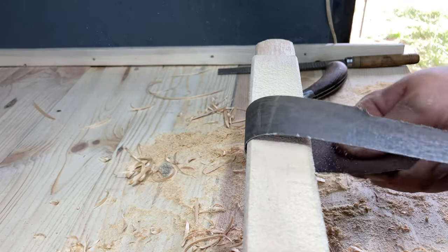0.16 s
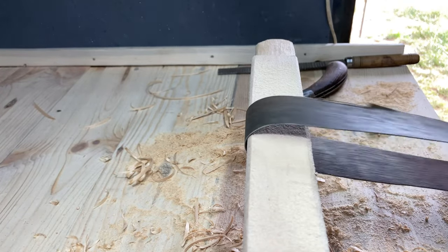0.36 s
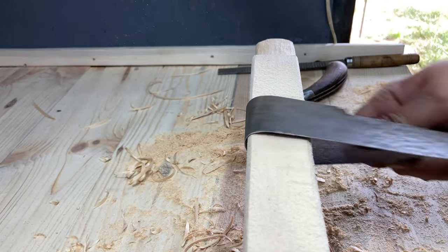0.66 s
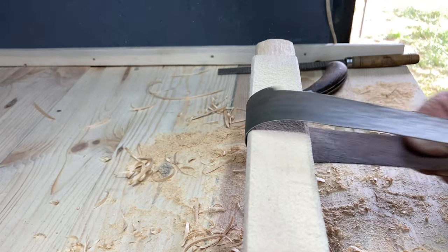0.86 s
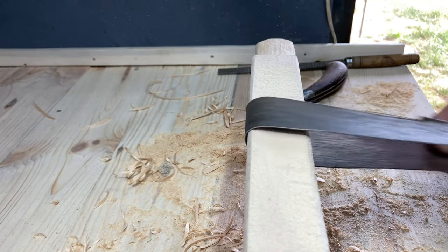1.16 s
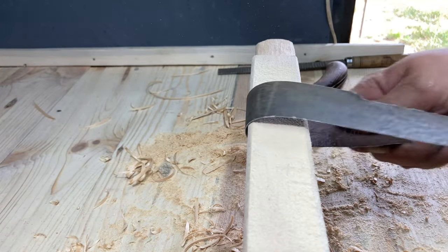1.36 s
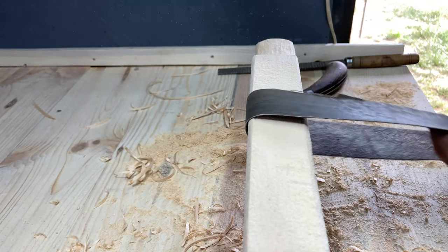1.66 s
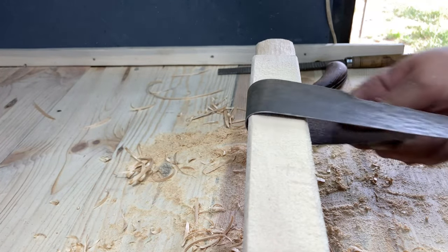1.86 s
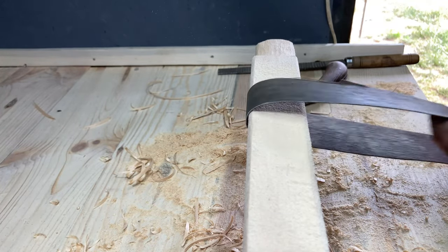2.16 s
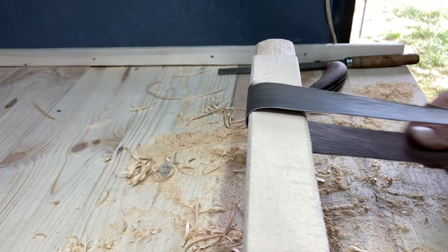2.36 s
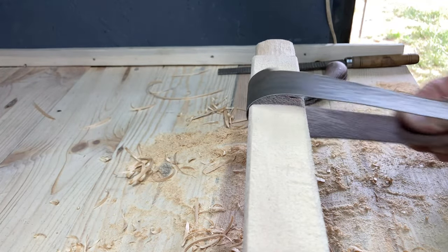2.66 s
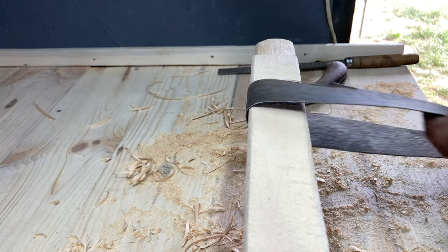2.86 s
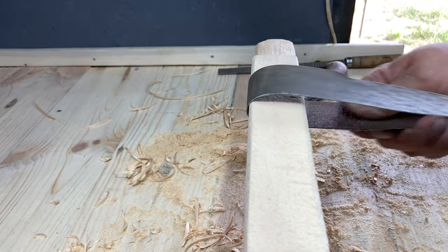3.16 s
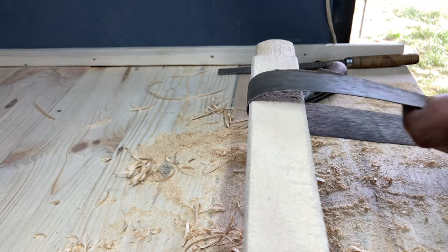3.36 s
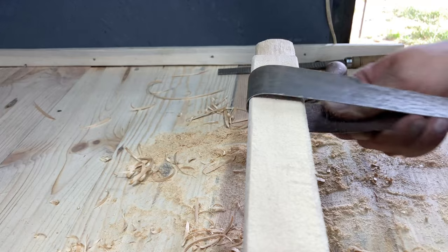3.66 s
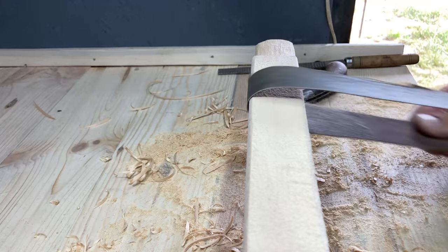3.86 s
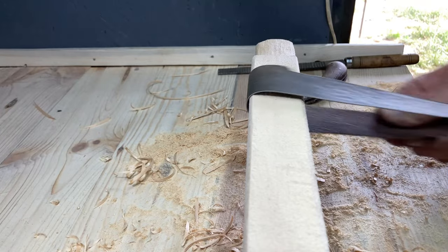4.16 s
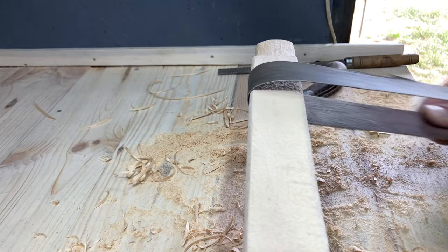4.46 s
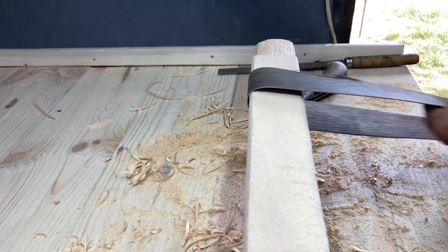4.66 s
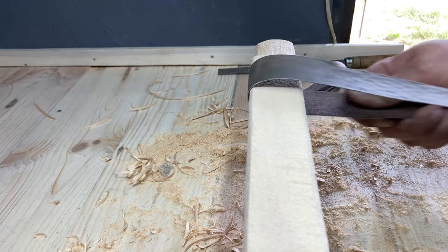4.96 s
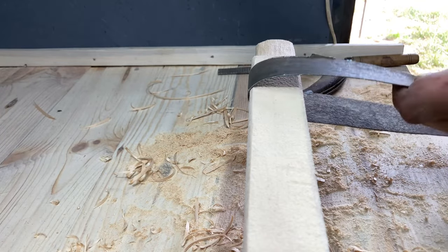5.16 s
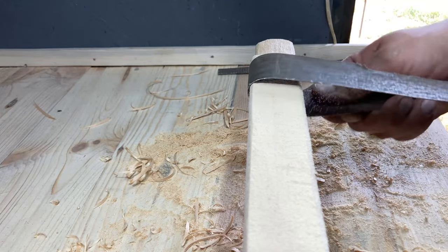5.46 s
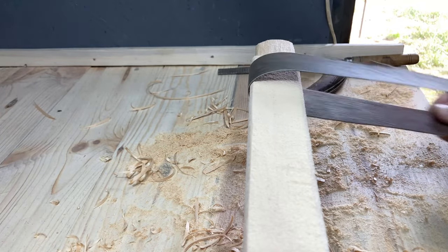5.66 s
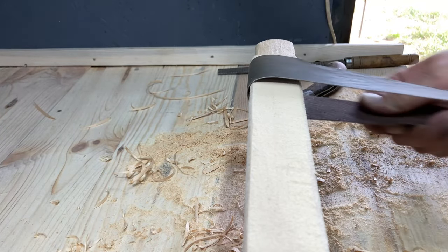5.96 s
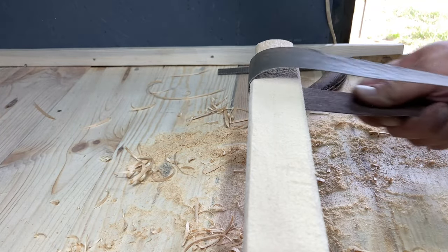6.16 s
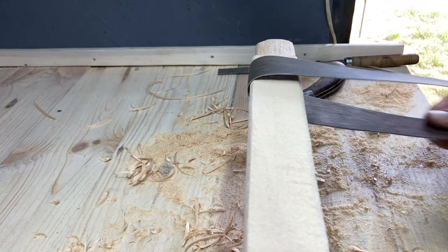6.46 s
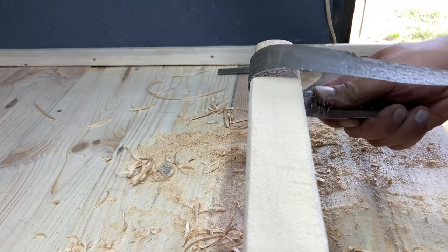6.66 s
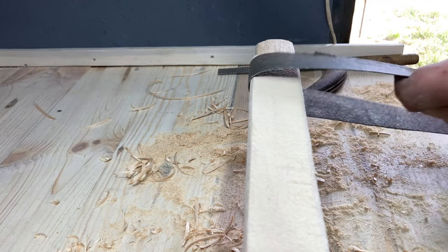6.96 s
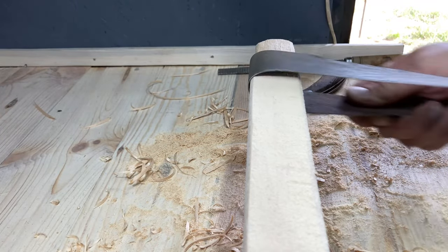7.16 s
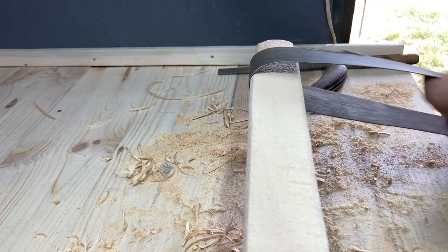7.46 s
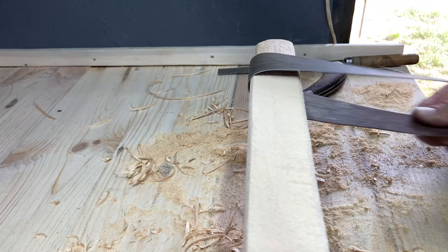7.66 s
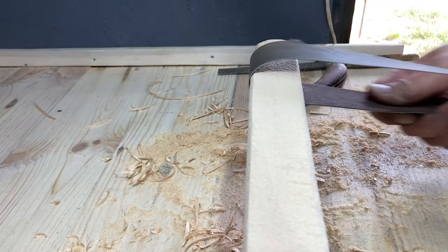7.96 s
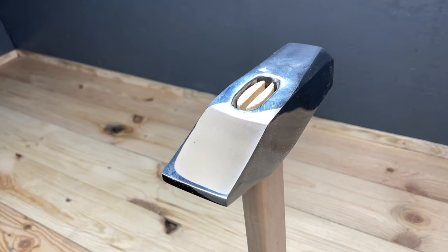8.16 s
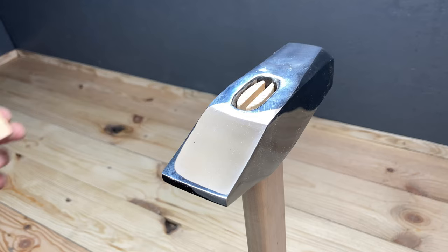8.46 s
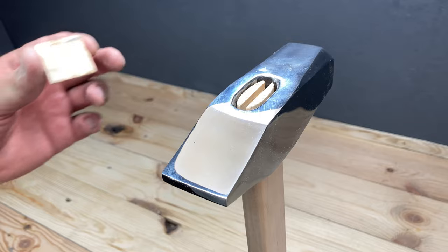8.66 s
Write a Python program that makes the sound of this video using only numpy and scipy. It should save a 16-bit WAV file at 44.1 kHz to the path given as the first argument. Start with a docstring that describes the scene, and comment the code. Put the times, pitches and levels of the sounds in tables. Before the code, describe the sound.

From the very start, a strip of abrasive cloth is pulled back and forth around a wooden handle, heard close in a quiet workshop with little echo. The strokes are quick and even, nearly four a second. Each is a dry, gritty hiss that swells and fades, coloured by the hollow resonance of the wood, with the outward and return pulls slightly different in tone. At each reversal the strip catches and the handle rings briefly, a little more clearly from about 2 seconds on. A soft low rumble from the workbench runs underneath. The tone of the rasp shifts gradually as the strip creeps along the wood. At about 8.2 seconds the sanding cuts off abruptly, leaving low room noise. A very faint, distant bird gives two short whistles between 8.2 and 8.5 seconds, and a tiny rustle follows around 8.7 seconds.

```python
"""In a quiet workshop, a strip of abrasive cloth is pulled to and fro round a clamped wooden handle. Sliding
friction gives a hiss proportional to the strip's speed and forces the bending modes of the handle and the
bench; at each reversal the strip breaks loose and the handle rings freely. At 8.15 s the sanding sound and its
reverberation break off at once, leaving the room's noise floor, a distant bird and a faint rustle."""
import sys
import numpy as np
from scipy import signal
from scipy.fft import rfft, irfft, next_fast_len
from scipy.io import wavfile
from scipy.ndimage import uniform_filter1d, map_coordinates

SR = 44100
rng = np.random.default_rng(int(sys.argv[2]) if len(sys.argv) > 2 else 0)


def wav_out(sig):
    """Save sig, one row per channel (or a flat mono array), as 16-bit PCM at SR to the path in sys.argv[1]."""
    wavfile.write(sys.argv[1], SR, np.round(np.clip(np.atleast_2d(sig).T, -1, 1) * 32767).astype(np.int16))


N = 388074
TIME = np.arange(N) / SR

# Strokes, out and back in turn: (grip time [s], stop time [s], jolt [dB], pressure [dB],
# coarse patch boost [dB], low bend boost at start [dB], low bend boost at end [dB])
STROKE_PLAN = [(-0.07, 0.163, -55, -1.5, 2.5, -2.5, 2), (0.199, 0.449, -46, -0.5, 1, 0, -1),
               (0.489, 0.743, -41.5, 0, -1, 0, 1), (0.779, 1.044, -38, -0.4, 2.5, 0, -1),
               (1.074, 1.347, -35, -0.5, 1, -1.5, 1), (1.374, 1.638, -35.5, -0.5, 2.5, 0, -1),
               (1.669, 1.944, -36, -0.5, 2, -2, 2.5), (1.973, 2.239, -31, -0.5, 4.5, 0.5, -2.5),
               (2.268, 2.537, -38, -1, 5.5, 3.5, 1), (2.565, 2.835, -29, 0.5, 2.5, 1.5, -1.5),
               (2.868, 3.119, -39, 0, 2, -0.5, 3), (3.145, 3.416, -29.5, -0.5, 3, 1, -1),
               (3.444, 3.726, -38, -1, -1, -0.5, -0.5), (3.75, 4.003, -29.5, 0.5, 4.5, 2.5, 0.5),
               (4.037, 4.298, -42, -0.5, 3, -1, -1), (4.332, 4.604, -34, 0.5, 4, 2, -1),
               (4.63, 4.902, -33, -1.2, 2, 2, 1), (4.93, 5.198, -33.5, -0.5, 3, 0.5, -2),
               (5.224, 5.493, -32, -1.5, 4, -2.5, 0.5), (5.524, 5.784, -41, 0.5, 5, 0.5, -1),
               (5.813, 6.086, -27, -0.5, 5, 2, 1.5), (6.114, 6.387, -29, -0.5, 5.5, 3, -1.5),
               (6.404, 6.668, -32, -0.5, 6.5, -1, 3.5), (6.699, 6.974, -25, -0.5, 5.5, 2, 0),
               (7.002, 7.266, -39, -0.2, 5, -1.5, 1.5), (7.294, 7.559, -31.5, -1.5, 5.5, -0.5, -0.5),
               (7.585, 7.867, -31, -1, 2.5, -0.5, -1.5), (7.899, 8.169, -28.5, -1, 3.5, -0.5, 0.5)]
# The creeping strip passes four places on the handle: (time [s])
PLACE_TIMES = [0.5, 3.5, 5.5, 8]
# Handle's upper modes: (frequency [Hz], bandwidth [Hz], level at each of the four places [dB],
# boost on outward strokes [dB])
UPPER_MODES = [(1096, 49, -3, -11.5, -10.5, -12.5, 0.5), (1458, 140, -5.5, -23, -15.5, -11.5, 5),
               (1582, 33, 6.5, -5, 0, 4.5, 1), (1738, 27, -1.5, -16, -0.5, -2, 1),
               (1964, 182, -7, -8, -4, -10.5, -1), (2018, 44.5, 8, 7.5, 4, -2, 0),
               (2085, 37, 1.5, 1.5, -2, -17, 0), (2303, 62, -5.5, -0.5, 1, 0, -3.5),
               (2442, 46, -13, -0.5, 2.5, -2.5, -1), (2630, 44, -4, -7, -6.5, -10, -6),
               (2804, 44, -6.5, -4.5, -4, -14, -3), (3040, 60, -29, -12, -22.5, -33, -2),
               (3080, 180, -28.5, -13, -16.5, -18, -4.5), (3590, 31, -5.5, -11.5, -9, -3, -3.5),
               (3798, 99, -7, -17.5, -10, -7, -3), (4070, 67, -6.5, -23, -10.5, -7.5, 0.5),
               (4250, 72, -28.5, -20, -18.5, -11, 1), (4660, 180, -13, -25, -19.5, -7.5, -3),
               (4840, 100, -21.5, -31.5, -39, -25.5, -9.5), (5820, 120, -18, -17.5, -25, -18.5, 3),
               (6000, 61, -10, -13, -14.5, -13, 0.5), (6310, 78, -20, -17, -24.5, -16.5, 1.5)]
# Modes of the handle's low bends, the bench, its legs and the rustle:
# (frequency [Hz], bandwidth [Hz], relative level [dB])
FIRST_BEND_MODES = [(631.2, 41.3, 4.5), (665.2, 35.6, 7), (711.5, 37, -0.5)]
SECOND_BEND_MODES = [(816, 24, 0), (875, 40, -12)]
BENCH_MODES = [(124, 11, 0), (160, 20, -2), (218, 20, -5), (268, 22, -9), (310, 30, -15), (350, 30, -19)]
LEG_MODES = [(32, 14, -16), (44, 16, -8), (60, 11, 0)]
RUSTLE_RESONANCES = [(340, 60, -1), (560, 120, -11), (1110, 90, -8)]
# Spectra of the friction noise and the noise floor: (frequency [Hz], relative density [dB])
GRIT_SPECTRUM = [(400, -20), (900, -34), (1500, -2.5), (3000, -2), (5000, -1.5), (7000, -8), (10000, -11),
                 (12500, -18), (15700, -27)]
AIR_SPECTRUM = [(12, -31), (20, -4), (74, 0.5), (126, -14), (213, -10), (352, -14), (505, -17.5),
                (581, -18), (2210, -27.5), (3450, -26.5), (5850, -30.5), (8400, -29.5), (15500, -43.5)]
# How hard the hands rock the bench: (time [s], relative level [dB])
ROCKING_LEVELS = [(0, 1), (1, -0.5), (1.8, -3), (2.4, 1), (3.5, -0.5), (4.2, 3), (5.6, 0), (6.8, 3.5),
                  (7.3, -0.5), (7.8, 2.5), (8.2, -2)]
# Decay of the room: (frequency [Hz], reverberation time [s])
ROOM_T60 = [(100, 0.9), (700, 0.073), (3000, 0.26), (12000, 0.17)]
# Whistles: (start [s], length [s], first pitch [Hz], last pitch [Hz], glide [s], level [dB],
# pitch flutter [fraction])
BIRD_NOTES = [(8.17, 0.21, 3900, 3330, 0.06, -75, 0.008), (8.405, 0.045, 4050, 4200, 0.04, -73, 0.04)]
# Envelope of the rustle: (time [s], level [dB])
RUSTLE_LEVELS = [(8.58, -90), (8.65, -67), (8.7, -65), (8.76, -72), (8.8, -80)]


def amp(db):
    """Amplitude ratio of a level in decibels."""
    return 10 ** (np.asarray(db) / 20)


def unit_rms(x):
    """Normalisation to an rms of 1."""
    return x / np.sqrt(np.mean(x ** 2) + 1e-20)


def log_interp(points, hz):
    """Interpolation of (frequency [Hz], value) points on a logarithmic axis."""
    knots_hz, values = np.transpose(points)
    return np.interp(np.log(hz + 1), np.log(knots_hz + 1), values)


def bell(x, centre, width):
    """Gaussian curve of height 1."""
    return np.exp(-0.5 * ((x - centre) / width) ** 2)


def wobble(knots_per_s):
    """Smooth random modulation: a spline through Gaussian knots."""
    return map_coordinates(rng.standard_normal(int(N * knots_per_s / SR) + 4), [TIME * knots_per_s])


def filtered(x, response):
    """Linear filtering: the spectrum is multiplied by a frequency response."""
    size = next_fast_len(N + SR // 2)
    return irfft(rfft(x, size) * response(np.fft.rfftfreq(size, 1 / SR)), size)[:N]


def resonator(force, hz, width_hz):
    """A damped mode with unit gain at resonance."""
    return signal.lfilter(*signal.iirpeak(hz, hz / width_hz, SR), force)


def radiation(x, cutoff_hz):
    """A body small against the wavelength radiates poorly: a high-pass."""
    return signal.sosfilt(signal.butter(4, cutoff_hz, "high", fs=SR, output="sos"), x)


def grit(spread_db):
    """Dense catches of uneven size add up to white noise."""
    return unit_rms(rng.standard_normal(N) * amp(spread_db * rng.standard_normal(N)))


def forced_body(modes, drive, cutoff_hz):
    """Modal superposition under a noise force; a drive of 1 gives an rms of 1."""
    def respond(x):
        return sum((-1) ** k * amp(db) * resonator(x, hz, width)
                   for k, (hz, width, db) in enumerate(modes))
    force = radiation(grit(spread_db=2.5), cutoff_hz)
    return respond(force * drive) / np.std(respond(force))


def stroke_motion():
    """Reciprocating motion, per sample: direction; progress, speed and contact (0-1); levels [dB]."""
    table = np.array(STROKE_PLAN)
    number = np.clip(np.searchsorted(table[:, 0], TIME) - 1, 0, None)
    outward = number % 2 == 0
    grips, stops, _, pressure_db, patch_db, start_db, end_db = table[number].T
    # The hiss starts suddenly at each grip and trails off just after the strip lets go.
    progress = np.clip((TIME - grips + 0.014) / (stops - grips + 0.024), 0, 1)
    skew = np.log(0.5) / np.log(0.56)  # fastest at 56% of the stroke
    speed = np.abs(np.sin(np.pi * progress ** skew))
    bite = np.clip((TIME - grips) / 0.0039, 0, 1)
    release = np.clip((stops - TIME) / 0.03, 0, 1)
    bends_db = start_db + (end_db - start_db) * progress
    return outward, progress, speed, bite, release, pressure_db, patch_db, bends_db


def friction_hiss(drive):
    """Direct friction noise; fine resonances shift as the strip wanders and blur in the treble."""
    hz, _, spectrum = signal.stft(grit(spread_db=2), SR, nperseg=1024)
    ripple = uniform_filter1d(rng.standard_normal(spectrum.shape), size=3, axis=0)
    ripple = unit_rms(uniform_filter1d(ripple, size=8, axis=1))
    depth_db = log_interp([(4500, 3.2), (8000, 1.3)], hz)[:, None]
    noise = signal.istft(spectrum * amp(depth_db * ripple), nperseg=1024)[1][:N]
    return drive * unit_rms(filtered(noise, lambda hz: amp(log_interp(GRIT_SPECTRUM, hz))))


def upper_modes(drive, outward, progress, patch_db):
    """Modal coupling: each mode is driven by how much it moves where the strip bears."""
    coarse_db = patch_db * bell(progress, np.where(outward, 0.65, 0.33), 0.099)  # a coarse patch passes
    grip_db = 3.5 * bell(progress, 0, 0.2)
    brake_db = 1.5 * bell(progress, 1, 0.15)
    force = filtered(grit(spread_db=1), lambda hz: hz ** 2 / (hz ** 2 + 900 ** 2))
    force *= drive * amp(-6.5 + coarse_db + grip_db + brake_db)
    sound, hop = np.zeros(N), 256
    for k, (hz, width_hz, *place_db, outward_db) in enumerate(UPPER_MODES):
        coupling_db = np.interp(TIME[::hop], PLACE_TIMES, place_db) + outward_db * outward[::hop]
        sound += (-1) ** k * resonator(force * np.repeat(amp(coupling_db), hop)[:N], hz, width_hz)
    return sound


def low_bends(contact, outward, progress, speed, bends_db):
    """Forced bending vibration of the handle, set by contact and almost independent of speed."""
    midstroke_db = np.where(outward, -1.5, 0.5) * np.sin(np.pi * progress) ** 2
    first_db = np.interp(TIME, PLACE_TIMES, [-30, -27, -25, -24.5]) + midstroke_db + 1.6 * wobble(7)
    second_db = np.interp(TIME, PLACE_TIMES, [-27, -28, -29, -30.5]) + 1.4 * wobble(5.6)
    drive = contact * amp(bends_db)
    first = forced_body(FIRST_BEND_MODES, drive * amp(first_db) * speed ** 0.027, cutoff_hz=543)
    second = forced_body(SECOND_BEND_MODES, drive * amp(second_db) * speed ** 0.063, cutoff_hz=566)
    return first + second


def bench_rumble(outward, progress, speed):
    """Structure-borne sound: the bench follows the growing pull and rocks on its legs."""
    rocking = amp(np.interp(TIME, *np.transpose(ROCKING_LEVELS)))
    pull = uniform_filter1d(0.38 + np.sin(np.pi * progress ** 1.95) ** 2, size=800)
    sway = uniform_filter1d(amp(np.where(outward, -51, -46.5)) * (0.66 + 0.14 * speed), size=4000)
    bench = forced_body(BENCH_MODES, amp(-42) * rocking ** 0.53 * pull, cutoff_hz=90)
    return bench + forced_body(LEG_MODES, rocking * sway, cutoff_hz=22)


def reverberation(x):
    """Convolution with a diffuse tail in which each frequency decays exponentially at its own rate."""
    hz, t, spectrum = signal.stft(rng.standard_normal(SR // 3), SR, nperseg=256)
    decay = amp(-60 * t / log_interp(ROOM_T60, hz)[:, None])
    tail = signal.istft(spectrum * decay, SR, nperseg=256)[1]
    return signal.fftconvolve(np.pad(x, (250, 0)), tail / np.linalg.norm(tail))[:N]


def room_air():
    """The noise floor: broadband noise with slight amplitude modulation."""
    noise = filtered(rng.standard_normal(N), lambda hz: amp(log_interp(AIR_SPECTRUM, hz)))
    return amp(-60.5 + 1.2 * wobble(3.4)) * unit_rms(noise)


def reversal_jolts():
    """Free damped vibration: the strip breaks loose at each reversal and the low bends ring once."""
    sound, t = np.zeros(N + SR), np.arange(SR // 10) / SR
    attack = 1 - np.exp(-t / 0.0027)
    for grips, _, jolt_db, *_ in STROKE_PLAN[1:]:
        ringing = sum(amp(db + rng.normal(0, 2.8)) * np.exp(-np.pi * width * t)
                      * np.sin(2 * np.pi * hz * t)
                      for hz, width, db in FIRST_BEND_MODES + SECOND_BEND_MODES)
        sound[round(grips * SR):][:len(t)] += amp(jolt_db) * ringing * attack
    return radiation(sound[:N], cutoff_hz=520)


def bird():
    """Far whistles outside: tones that glide, then hold, modulated in frequency and amplitude."""
    sound, tremolo, waver = np.zeros(N), amp(2.5 * wobble(40)), wobble(150)
    for start, length, first_hz, last_hz, glide, db, flutter in BIRD_NOTES:
        pitch = np.interp(TIME, [start, start + glide], [first_hz, last_hz]) * (1 + flutter * waver)
        swell = np.interp((TIME - start) / length, [0, 0.2, 0.8, 1], [0, 1, 0.5, 0])
        sound += amp(db) * swell * np.sin(2 * np.pi * np.cumsum(pitch) / SR)
    return np.sqrt(2) * tremolo * sound


def rustle():
    """A faint rustle nearby: noise excites a few heavily damped resonances."""
    level_db = np.interp(TIME, *np.transpose(RUSTLE_LEVELS), left=-200)
    return forced_body(RUSTLE_RESONANCES, amp(level_db), cutoff_hz=200)


def scene():
    """Superposition: one motion drives all the sanding, which is gated off with its reverberation."""
    outward, progress, speed, bite, release, pressure_db, patch_db, bends_db = stroke_motion()
    catch = amp(pressure_db + 1.2 * wobble(14) + 1.3 * wobble(45))  # the grit bites unevenly
    upper_drive = catch * bite ** 1.9 * release ** 2.2 * (0.086 + speed) ** 0.76
    sanding = friction_hiss(amp(-25) * catch * speed)
    sanding += upper_modes(upper_drive, outward, progress, patch_db)
    sanding += low_bends(bite * release, outward, progress, speed, bends_db)
    sanding += reversal_jolts()
    sanding += bench_rumble(outward, progress, speed)
    sanding += amp(-10.5) * reverberation(sanding)
    gate = np.clip((8.1515 - TIME) / 0.0013, 0, 1)
    return (sanding * gate + room_air() + rustle() + bird())[None]


def record(dry):
    """Band limiting: an ideal low-pass at 15.7 kHz."""
    return filtered(dry[0], lambda hz: hz < 15700)[None]


dry = scene()
out = record(dry)
wav_out(out)
```